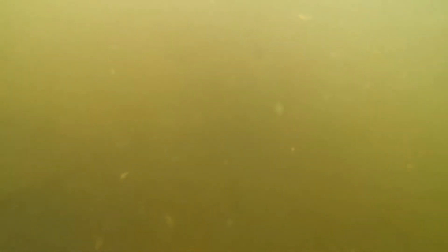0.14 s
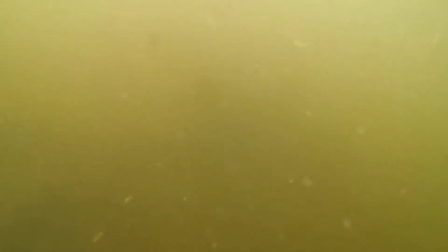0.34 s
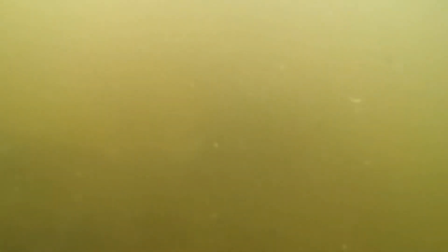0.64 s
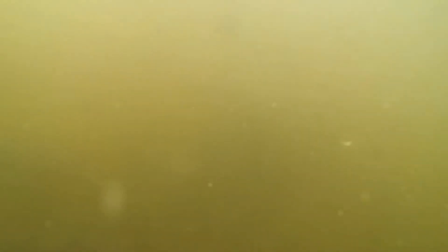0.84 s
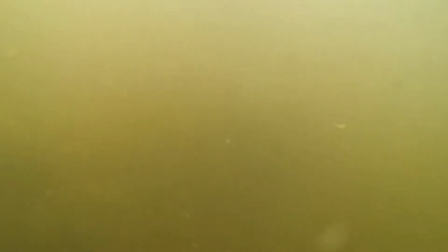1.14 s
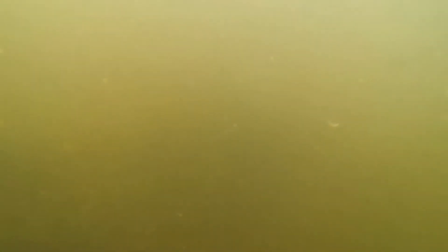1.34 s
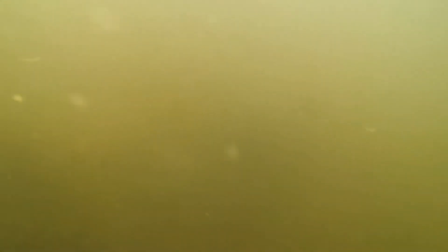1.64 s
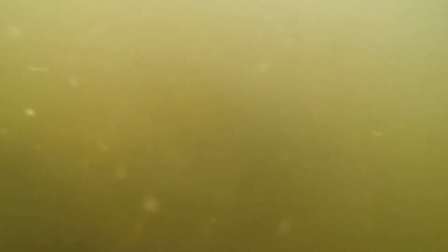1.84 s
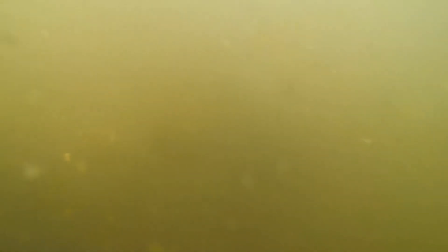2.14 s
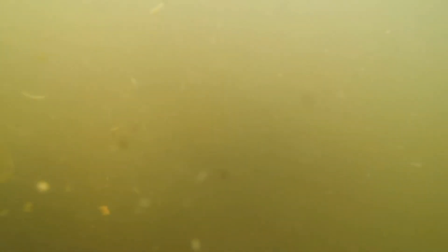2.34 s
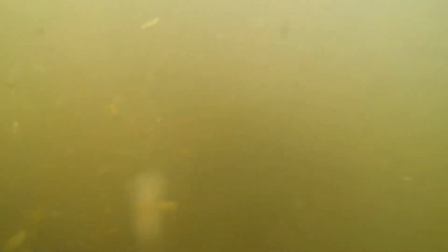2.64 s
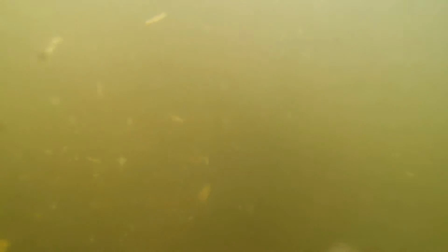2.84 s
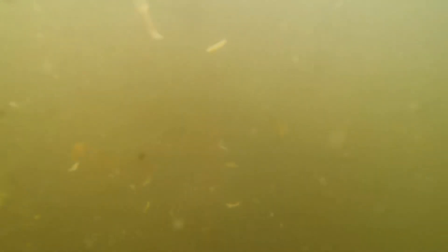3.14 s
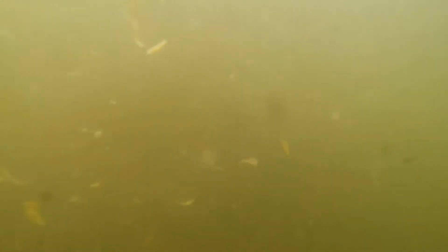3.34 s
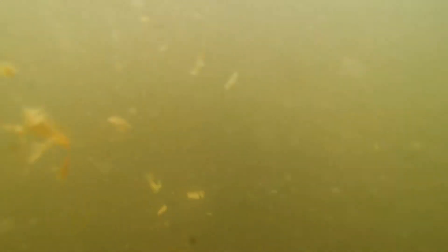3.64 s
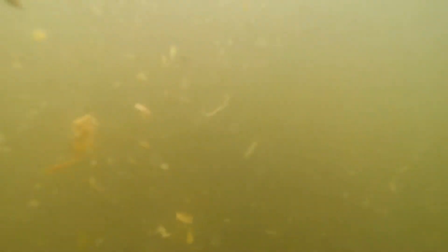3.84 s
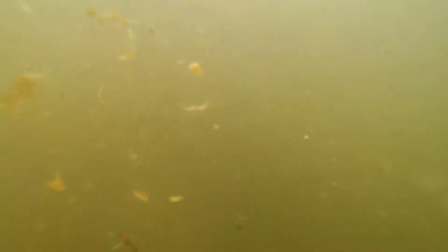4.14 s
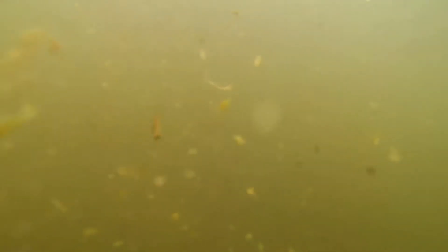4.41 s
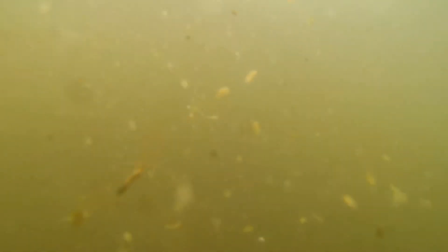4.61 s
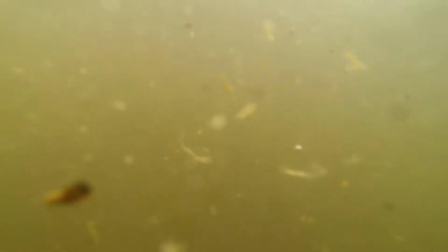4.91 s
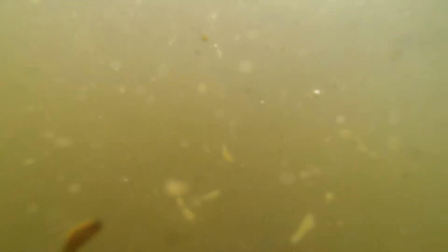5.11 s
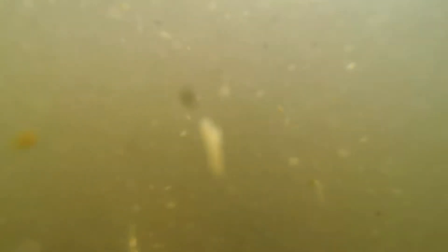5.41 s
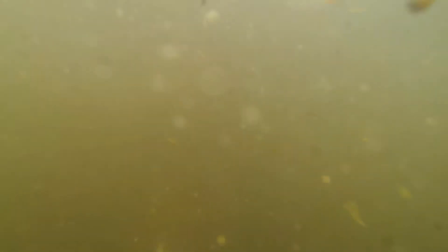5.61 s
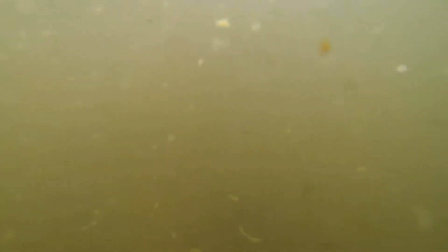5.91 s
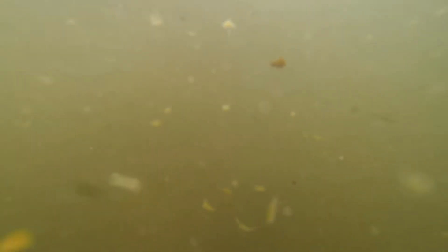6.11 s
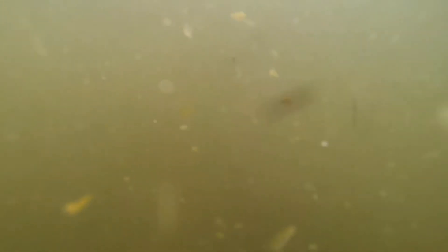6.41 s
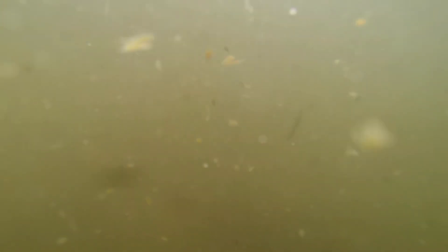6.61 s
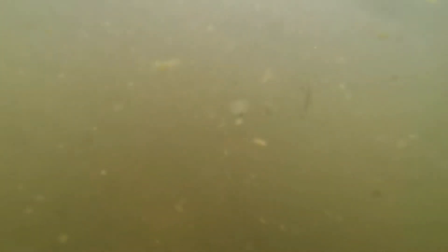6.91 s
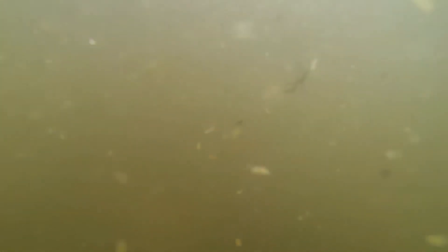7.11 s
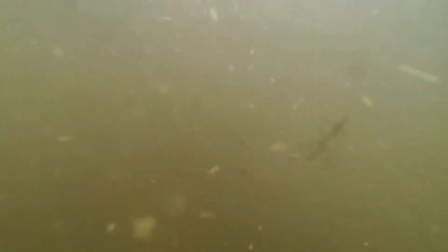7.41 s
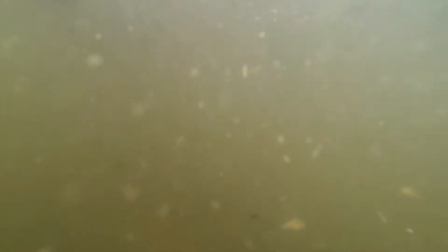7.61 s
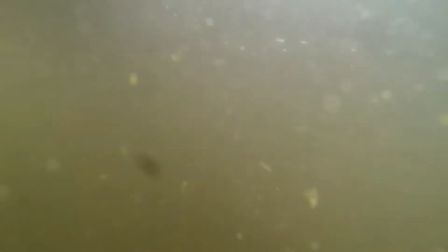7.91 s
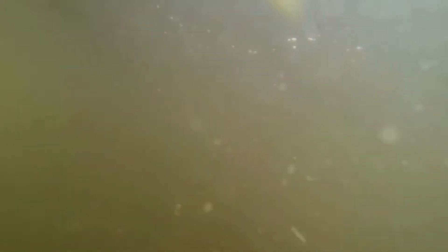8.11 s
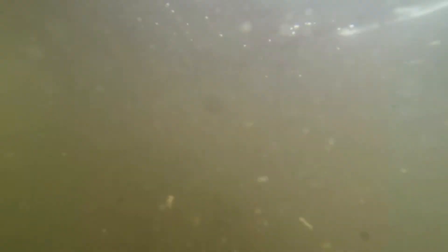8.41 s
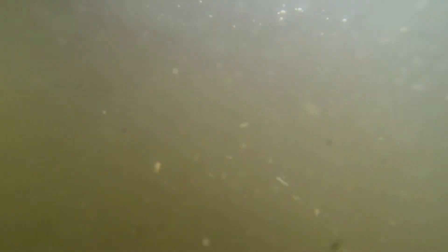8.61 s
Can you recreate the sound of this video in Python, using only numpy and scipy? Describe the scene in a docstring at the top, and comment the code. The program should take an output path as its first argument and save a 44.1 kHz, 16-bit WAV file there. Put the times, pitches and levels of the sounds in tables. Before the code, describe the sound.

Close, underwater sound in murky water. At 0 s a cut ends with a low thump, leaving soft wash, a rising low engine throb and faint scuffs. At 0.96 s a power cutter jolts in: loud, dense metallic rasp, bright and fizzy, stopping at 1.44 s amid low bubble blips and brushing grit. At 1.87 s it bites again and runs to 5.56 s, buzzing around 350-480 blows a second. It skims, digs in near 2.3 s, slips and catches around 3.1, 3.8 and 5.1 s; its whine grows, with squeals at 4.3-4.7 s and a pinched shriek towards the end. It stops abruptly with a bright double bubble pop. Then a quicker low throb, humming pump, airy hiss and thin breathy whistle near 5 kHz continue. Sharp knocks land at 5.84, 6.05 and 6.29 s, small bubbles around 7.1 s, and knocks with low sways from 8.4 s to the end.

```python
"""Murky water: a power cutter runs out of a cut over an engine's throb, then makes a short and a long cut.
Some 400 tooth blows a second ring the tool and the work; each cut jolts, skims and digs in, and its
whine grows. In the long cut the teeth slip and catch, and the pinched blade shrieks and squeals.
Afterwards the engine throbs, its pump hums and hisses, and a valve whistles. Around the cuts bubbles pop,
grit brushes the blade and small things knock on the submerged housing: dying sines and filtered bursts."""
import sys
import numpy as np
from scipy import signal
from scipy.fft import rfft, irfft
from scipy.io import wavfile
from scipy.ndimage import uniform_filter1d, map_coordinates

SR = 44100
rng = np.random.default_rng(int(sys.argv[2]) if len(sys.argv) > 2 else 0)


def inscribe(sig):
    """Save sig as 16-bit PCM at rate SR to the path in sys.argv[1].

    A 1-D sig is mono; a 2-D sig holds one channel per row.
    Samples are clipped to [-1, 1] before scaling.
    """
    pcm = np.round(np.clip(np.atleast_2d(sig).T, -1, 1) * 32767)
    wavfile.write(sys.argv[1], SR, pcm.astype(np.int16))


N = 385875
TIME = np.arange(N) / SR


def undb(db):
    """Decibels to gain."""
    return 10 ** (np.asarray(db) / 20)


def unit(x):
    """Scale to an rms of one."""
    return x / np.sqrt(np.mean(x ** 2))


def curves(rows):
    """Each column of a table as straight lines through time."""
    s, *columns = np.transpose(rows)
    return [np.interp(TIME, s, c) for c in columns]


def noise():
    """White noise for the whole scene."""
    return rng.standard_normal(N)


def sine(turns):
    """A sine with an rms of one, from its phase in turns."""
    return np.sqrt(2) * np.sin(2 * np.pi * turns)


def bump(t, half):
    """A smooth rise and fall around t = 0, down to 1/e at the half length."""
    return np.exp(-(t / half) ** 2)


def walk(rate):
    """Smooth random drift with a spread near one, from `rate` random steps a second."""
    k = max(int(SR / rate), 1)
    steps = np.repeat(rng.standard_normal(N // k + 1), k)
    smooth = uniform_filter1d(uniform_filter1d(steps, k), k)
    return unit(smooth[:N])


def resonate(x, modes, size=8192):
    """Ring x through steep-sided resonances; the response is causal and has unit energy."""
    f = np.fft.rfftfreq(size, 1 / SR)
    power = np.zeros(len(f))
    for hz, width, db in modes:
        detune = (f ** 2 - hz ** 2) / (width * (f + 1))
        power += undb(db) ** 2 / (1 + detune ** 2) ** 2
    # folding the cepstrum forward gives the minimum-phase response
    cepstrum = irfft(np.log(power + 1e-9) / 2)
    cepstrum[1:size // 2] *= 2
    cepstrum[size // 2 + 1:] = 0
    response = irfft(np.exp(rfft(cepstrum)))
    return signal.fftconvolve(x, response / np.linalg.norm(response))[:len(x)]


def add(out, s, sound):
    """Mix a sound in at a time."""
    start = max(int(s * SR), 0)
    out[start:start + len(sound)] += sound[:max(N - start, 0)]


def pulses(turns):
    """One click at each whole turn, shared between neighbouring samples."""
    at = np.flatnonzero(np.diff(np.floor(turns)) > 0)
    late = (np.ceil(turns[at]) - turns[at]) / (turns[at + 1] - turns[at])
    out = np.zeros(N)
    out[at], out[at + 1] = 1 - late, late
    return out


def ping(hz, t60, glide, rise):
    """A dying sine whose pitch drifts as it fades."""
    t = TIME[:SR // 2]
    fade = np.exp(-np.log(1000) * t / t60) * (1 - np.exp(-t / rise))
    return fade * np.sin(2 * np.pi * hz * (t + glide * t ** 2 / (2 * t60)))


def scuff(decay):
    """A short burst of rubbing: noise that swells fast and dies away."""
    t = TIME[:SR // 4] / decay
    return rng.standard_normal(len(t)) * (1 - np.exp(-2 * t)) * np.exp(-t) * 2


def delayed(x, lag_ms):
    """The sound after a path whose length may change."""
    return map_coordinates(x, [np.arange(N) - lag_ms * SR / 1000], order=3)


def reflect(x, path):
    """A close echo combs the sound; the comb slides as the path changes."""
    lag_ms, share = curves(path)
    return (x + share * delayed(x, lag_ms)) / np.sqrt(1 + share ** 2)


# further paths by the rippling surface and the bed: lag_ms, share (negative flips the wave)
WATER_PATHS = [(.95, -.17), (1.45, .17), (2.4, -.15), (4.1, .14)]


def shimmer(x):
    """Wandering paths through the water draw fine, wavering streaks in the sound."""
    return x + sum(share * delayed(x, lag_ms + .05 * walk(2.5)) for lag_ms, share in WATER_PATHS)


# colour of the wash: pitch_hz, relative density_db (per Hz)
WASH_COLOUR = [(15, -1.5), (35, -8.5), (90, -12.5), (200, -20.5), (350, -30.5), (700, -28.5), (1100, -37),
               (2200, -40), (5000, -46), (12500, -49.5), (15000, -62)]
# water pushing on the housing: centre_s, level_db, half_length_s
SURGES = [(0, -29.5, 0.035), (.98, -43, 0.03), (1.472, -33, 0.05), (1.894, -41, 0.02), (2.3, -43, .025),
          (3.1, -41, .05), (3.847, -44, 0.037), (4.88, -47, .1), (5.34, -36.5, 0.088), (8.6, -46.5, 0.23)]
CURRENT_DB, WASH_DB = -52, -51.5  # the steady push between surges; the wash


def water():
    """A soft wash of coloured noise, and slow surges as low rumble on the housing."""
    hz, db = np.transpose(WASH_COLOUR)
    f = np.fft.rfftfreq(N, 1 / SR)
    colour = undb(np.interp(np.log(f + 1), np.log(hz), db))
    wash = unit(irfft(rfft(noise()) * colour, N))
    push = undb(CURRENT_DB) + sum(undb(db) * bump(TIME - s, half) for s, db, half in SURGES)
    surge = unit(resonate(noise(), [(28, 14, 4.0), (49.0, 96, -7.0)]))
    return undb(WASH_DB) * wash + push * surge


# resonances that carry the throb: pitch_hz, width_hz, relative level_db
THROB_MODES = [(57.6, 24, 5), (115, 34, -5), (155.5, 36.4, 7.5), (273, 42.5, 0.5), (560, 700, -17.5)]


def engine_throb(turns):
    """Firings of slightly uneven force thud through the water."""
    force = undb(1.0 * walk(30))
    return unit(resonate(pulses(turns) * force, THROB_MODES))


# the pump's hum: multiple of the firing rate, level_db (at the loudest throb)
HUM = [(13, -74), (15, -67.5), (16, -72.5), (19, -72), (20, -76), (21, -69.5), (24, -87), (25, -69.5)]


def pump_hum(turns, throb_db):
    """Steady partials on multiples of the firing rate; they follow the engine's load."""
    hum = sum(undb(db + 1.5 * walk(2.94)) * sine(order * turns + rng.random()) for order, db in HUM)
    return hum * undb(throb_db - throb_db.max())


# resonances that carry the hiss: pitch_hz, width_hz, relative level_db
PUMP_MODES = [(1657, 380, -4), (2590, 620, -6.5), (2904, 230, 1), (3250, 310, -2), (4030, 2000, -15),
              (6280, 1340, -17)]


def pump_hiss():
    """Rushing flow: noise through the pump's resonances, slightly unsteady."""
    return unit(resonate(noise(), PUMP_MODES)) * undb(0.67 * walk(27))


# with the cutter off the flow whistles through a valve: time_s, pitch_hz, level_db
VALVE = [(5.55, 4900, -65), (5.7, 4920, -67), (6.1, 5070, -62.5), (6.7, 5080, -60.5), (7.1, 5040, -65.5),
         (7.6, 5100, -63), (8.75, 5160, -69.5)]


def valve_whistle():
    """Slow and quick eddies scatter a drifting tone into a breathy whistle."""
    hz, db = curves(VALVE)
    eddies = walk(330) + 1j * walk(330) + 0.66 * (walk(1300) + 1j * walk(1300))
    tone = np.exp(2j * np.pi * np.cumsum(hz) / SR)
    return undb(db) * (TIME > VALVE[0][0]) * unit(np.real(eddies * tone))


# engine: time_s, firing_rate_hz, throb_db, pump_hiss_db
ENGINE = [(0, 27.07, -69, -72), (.55, 24.5, -56.5, -68.5), (1.7, 24.3, -55.5, -67.5),
          (5.5, 28.67, -63.5, -56), (5.8, 28.82, -51, -57.5), (7, 28.78, -52, -59.5),
          (7.8, 28.92, -50, -58.5), (8.75, 28.22, -48.5, -58)]
# shifting reflection of the pump's sound: time_s, lag_ms, share
PUMP_ECHO = [(5.6, 0.51, .12), (6.7, 0.64, 0.16), (7.2, 0.64, 0.025), (8.2, 0.734, 0.31), (8.75, 0.73, .2)]


def engine():
    """One firing rate drives throb and hum; hiss and whistle pass the shifting reflection and the water."""
    hz, throb_db, hiss_db = curves(ENGINE)
    turns = np.cumsum(hz) / SR
    flow = undb(hiss_db) * pump_hiss() + valve_whistle()
    throb = undb(throb_db) * engine_throb(turns)
    return throb + pump_hum(turns, throb_db) + shimmer(reflect(flow, PUMP_ECHO))


# slow sways of the housing: start_s, level_db, pitch_hz, t60_s
SWAYS = [(.005, -17, 54, 0.014), (.965, -20.5, 64, 0.088), (1.439, -24, 64, 0.2), (1.89, -30, 49.4, 0.14),
         (8.419, -21.5, 41.3, 0.33), (8.725, -20, 45.96, 0.25)]


def sways():
    """The housing rocks: low dying sines that sag in pitch."""
    out = np.zeros(N)
    for s, db, hz, t60 in SWAYS:
        add(out, s, undb(db) * ping(hz, t60, glide=-0.12, rise=0.0005))
    return out


# grit brushing the idle blade: start_s, level_db, decay_s
GRIT = [(.138, -50.5, 0.011), (0.907, -48, 0.015), (1.476, -41, 0.0063), (1.58, -44.5, 0.0047),
        (1.692, -41.5, 0.0051), (5.728, -42, 0.0022), (6.856, -50, .004), (6.945, -52, .006),
        (7.686, -44.5, 0.0034), (7.982, -49, 0.0023), (8.413, -49, 0.00085)]


def grit():
    """Short scuffs ring the blade's broad resonances."""
    out = np.zeros(N)
    blade = [(1770, 550, -12.5), (2920, 1300, -5.0), (5170, 4000, -17.5)]
    for s, db, decay in GRIT:
        add(out, s, undb(db) * resonate(scuff(decay), blade))
    return out


# bubbles: start_s, level_db, pitch_hz, t60_s
BUBBLES = [(1.366, -16, 447.4, 0.044), (1.384, -24, 380.2, 0.11), (1.413, -25, 432, 0.092),
           (2.23, -23.5, 423, 0.14), (2.261, -27.5, 370, 0.085), (5.545, -10, 1890, 0.023),
           (5.561, -3.5, 1197, 0.04), (6.945, -42.5, 1370, 0.041), (7.128, -41.5, 2020, 0.041),
           (7.171, -33.5, 2680, 0.033)]


def bubbles():
    """Each bubble rings as a dying sine that creeps up in pitch, with a snap as it pinches off."""
    out = np.zeros(N)
    for s, db, hz, t60 in BUBBLES:
        add(out, s, undb(db) * ping(hz, t60, glide=0.046, rise=0.00086))
        add(out, s, undb(db - 7) * resonate(scuff(0.0022), [(hz, hz / 2, 0)]))
    return out


# knocks on the housing: start_s, peak_db, deep_thud_db, scuff_decay_s
KNOCKS = [(.909, -36, -71, 0.016), (1.648, -42, -60, 0.00064), (5.685, -40.5, -68, 0.014),
          (5.708, -39, -64, 0.014), (5.765, -43, -45, 0.0016), (5.824, -37, -52, 0.01),
          (5.838, -26.5, -38, 0.0036), (6.051, -16, -20, 0.00053), (6.2933, -20.5, -24.5, 0.00037),
          (7.249, -46, -29, 0.0023), (7.683, -38, -72, .001), (8.412, -23, -37, 0.0011),
          (8.432, -38, -60, 0.0061), (8.487, -44, -70, 0.0099), (8.565, -37, -53, 0.00087),
          (8.722, -37, -50, 0.0086)]
# housing modes: pitch_hz, width_hz, relative level_db
HOUSING = [(184, 137, 3), (487, 600, -6.5), (773, 210, -7), (903, 160, 3.5), (1193, 250, -1.5),
           (1330, 74, -3.5), (1740, 180, -9)]


def knocks():
    """A sharp push and a scuff ring the housing's modes, over a deep thud."""
    out = np.zeros(N)
    for s, db, thud_db, decay in KNOCKS:
        rub = scuff(decay)
        # first contact is one sharp push, then the thing rubs along
        knock = resonate(rub + 8 * signal.unit_impulse(len(rub)), HOUSING)
        add(out, s, undb(db) * knock / np.abs(knock).max())
        add(out, s, undb(thud_db) * ping(hz=92, t60=0.041, glide=-.1, rise=0.00013))
    return out


# the cuts: start_s, end_s, level_db, extra_fizz_db, run_out_db
CUTS = [(-1.9, 0.0012, -4, 7.5, -36), (.957, 1.439, 1.1, 9, -18.5), (1.874, 5.558, 0, 1, -34.5)]
ATTACK_S, RELEASE_S, RUN_OUT_S = 0.014, 0.0066, 0.047


def cuts():
    """Each cut starts fast, holds and runs out: its gain, the time since it began, its extra fizz."""
    gain, age, fizz_db = np.zeros((3, N))
    for start, end, db, extra_db, run_out_db in CUTS:
        since, after = np.maximum(TIME - start, 0), np.maximum(TIME - end, 0)
        run_out = undb(run_out_db) * np.exp(-after / RUN_OUT_S)
        release = np.maximum(np.exp(-after / RELEASE_S), run_out)
        gain += undb(db) * (1 - bump(since, ATTACK_S)) ** 2 * release
        on = TIME >= start
        age[on], fizz_db[on] = (since - after)[on], extra_db  # age stops at the cut's end
    return gain, age, fizz_db


# the teeth slip, then catch with a jerk: catch_s, slip_length_s, depth_db
SLIPS = [(1.135, 0.023, -1), (2.309, 0.033, -5.5), (3.075, 0.062, -8), (3.128, 0.047, -6),
         (3.706, 0.032, -4.5), (3.85, 0.069, -6.5), (5.135, 0.074, -3)]
CATCH_DB, CATCH_S = 1.5, 0.032


def grip():
    """The teeth's hold in dB: it ebbs in a slip and returns at once, overshooting."""
    db = np.zeros(N)
    for s, length, depth_db in SLIPS:
        slipping = np.clip(1 + (TIME - s) / length, 0, 1)
        slip = depth_db * np.sin(2.3 * slipping)
        catch = CATCH_DB * np.exp(-np.abs(TIME - s) / CATCH_S)
        db += np.where(TIME < s, slip, catch)
    return db


def rasp(turns, scatter_db, contact, scrape_db, chip_db, chips_per_s):
    """Each tooth strikes with its own force and scrapes on; now and then a chip snaps off."""
    tooth = turns.astype(int)
    force = undb(scatter_db * np.clip(rng.standard_normal(N // 20), -2, 2))[tooth]
    strikes = pulses(turns)
    scrape = unit(np.exp(-(turns % 1) / contact) * noise())
    teeth = unit(force * (strikes / np.std(strikes) + undb(scrape_db) * scrape))
    snaps = rng.random(N) < chips_per_s / SR
    chips = snaps * rng.choice([-1, 1], N) * (1 + rng.random(N))
    return unit(teeth + undb(chip_db) * unit(chips))


# resonances of tool and work, low to high: pitch_hz, width_hz, relative level_db
GROWL = [(80.4, 82, -7.5), (237, 58, -23), (375, 89, -2.5), (505, 570, -6), (710, 188, 2.5),
         (892, 160, 5.5)]
BARK = [(1244, 150, -11.5), (1330, 160, -20), (1634, 127, 2.5), (1781, 143, 3.5), (2110, 110, -14)]
RING = [(2464, 280, 3), (2656, 280, 2), (3032, 390, 5), (3243, 263, 3.5), (3763, 360, -7.5),
        (4127, 710, -8.5)]
SPRAY = [(5040, 306, -10.5), (5280, 360, 3.5), (5790, 810, 3.5), (6500, 600, 1), (7190, 770, -4),
         (7950, 540, -0.5)]
FIZZ = [(9280, 2200, 6.5), (10950, 430, 5), (12800, 890, -3.5), (14400, 1500, -29)]
SPRAY_SHARE = 0.246  # how much of a cut's extra fizz reaches the spray


def ringing_body(blows, churn, gain, fizz_db):
    """Dry blows ring and bark; blows blurred by stirred water growl, spray and fizz."""
    spray_gain = gain["spray"] * undb(SPRAY_SHARE * fizz_db)
    fizz_gain = gain["fizz"] * undb(fizz_db + 1.1 * walk(50))
    return (gain["growl"] * unit(resonate(churn, GROWL))
            + gain["bark"] * unit(resonate(blows, BARK))
            + gain["ring"] * unit(resonate(blows, RING))
            + spray_gain * unit(resonate(churn, SPRAY))
            + fizz_gain * unit(resonate(churn, FIZZ)))


# modes of the pinched blade's shriek: pitch_hz, width_hz, relative level_db
SHRIEK = [(1375, 230, -7.5), (3223, 190, 5.5), (4720, 225, 1), (5230, 190, -11), (6030, 330, -8.5),
          (10780, 530, -21.5), (12800, 610, -32)]
# the pinched blade squeals for a moment: centre_s, half_length_s, pitch_hz, level_db
SQUEALS = [(4.307, 0.031, 1680, -19.5), (4.46, 0.035, 3220, -21), (4.65, 0.099, 3174, -18),
           (4.729, 0.041, 1730, -19.5)]
SHRIEK_DB, SQUEAL_WIDTH_HZ = -25.5, 200  # shriek at full pinch, in the cutter's own mix


def pinched_blade(churn, pinch):
    """The pinch makes the blade shriek on its modes, with brief squeals on single narrow ones."""
    shriek = undb(SHRIEK_DB) * pinch * unit(resonate(churn, SHRIEK))
    for s, half, hz, db in SQUEALS:
        squeal = unit(resonate(churn, [(hz, SQUEAL_WIDTH_HZ, 0)]))
        shriek += undb(db) * bump(TIME - s, half) * squeal
    return shriek


# now and then the blade sings out at the octave: centre_s, half_length_s, rise_db
SINGS = [(2.676, 0.32, 15.5), (4.42, .11, 13.5), (5.29, .08, 17.5)]
# the whine grows through a cut; uneven teeth beat an octave below, until the pinch steadies the blade
WHINE_DB, WHINE_DB_PER_S, OCTAVE_DB, UNEVEN_DB = -51.5, 5, -46.5, -56.5
WHINE_WOBBLE = 0.059  # unsteadiness of the blade's push, in tooth cycles


def blade_whine(turns, age, skim, pinch):
    """The blade's steady push whines at the tooth rate, its octave and half the rate."""
    push = turns + WHINE_WOBBLE * walk(150)
    sing_db = sum(db * bump(TIME - s, half) for s, half, db in SINGS)
    whine = (undb(WHINE_DB + WHINE_DB_PER_S * age) * sine(push)
             + undb(OCTAVE_DB + sing_db) * (1 - skim) * sine(2 * push)
             + undb(UNEVEN_DB) * (1 - skim) * (1 - pinch) ** 2 * sine(push / 2))
    return whine * undb(2 * walk(35))


# blade speed: time_s, tooth_rate_hz
TEETH = [(1.0, 410), (1.44, 440), (2.28, 410), (2.45, 472), (2.9, 482), (3.1, 352), (3.22, 380),
         (3.45, 335), (3.87, 345), (4.1, 392), (4.24, 374), (4.34, 433), (4.52, 432), (4.62, 388),
         (4.83, 438), (4.96, 394), (5.3, 377), (5.46, 478)]
# how hard the tool is pressed on: time_s, pressure_db
PRESSURE = [(1.0, 1), (1.1, -3), (1.25, -3), (1.43, -1), (1.9, 1), (2.1, 1.5), (2.42, -1), (2.95, 2.3),
            (3.2, 0.6), (3.53, -2.5), (3.7, 1.7), (4.0, 0), (4.27, -0.3), (4.39, -5), (4.52, -2.5),
            (4.86, -2.5), (5.0, 0.5), (5.55, -0.5)]
# a deep cut pinches the blade: time_s, pinch (0-1)
PINCH = [(3.5, 0.12), (4.3, 0.26), (4.5, 0.62), (4.8, 0.54), (5.25, 0.92), (5.55, 0.78)]
# how each resonance group answers: level_db, dB per dB of pressure, share of a slip,
# jolt_db, skim_db, dig_db, full_pinch_db
ANSWER = {"ring": (-16.5, 1, 1, 2.5, 0.5, -0.5, -.5), "growl": (-33, 0.72, 0.6, 12.5, -7, 4.5, 5),
          "bark": (-27.5, 0.32, 1, 6.5, -4, 2, 6), "spray": (-34.5, 1, 1.04, 3, 5, 0, 3),
          "fizz": (-47, 1.15, 0.9, 8, 2, -1, -1)}
# a reflection from the work shifts as the tool moves: time_s, lag_ms, share
WORK_ECHO = [(1.198, 0.26, 0.23), (1.9, 0.53, 0.015), (2.3, 0.69, 0.07), (3.0, 0.55, .02),
             (3.3, 0.27, 0.09), (3.901, 0.45, 0.055), (4.2, 0.423, 0.35), (4.45, 0.42, 0.027),
             (5.55, .43, 0.17)]
# every cut opens alike: a jolt, the teeth skim the surface, then they dig in
JOLT_S, SKIM_AT_S, SKIM_HALF_S, DIG_AT_S, DIG_HALF_S = 0.044, .2, 0.16, 0.468, 0.037
CHURN_DB, CHURN_PINCH_DB = -7, 7  # stirred water against the tooth blows, and its rise at full pinch


def cutter():
    """Tooth blows ring the tool and the work, while the blade's steady push whines."""
    (hz,), (pressure_db,), (pinch,) = curves(TEETH), curves(PRESSURE), curves(PINCH)
    running, age, fizz_db = cuts()
    jolt, dig, grip_db = np.exp(-age / JOLT_S), bump(age - DIG_AT_S, DIG_HALF_S), grip()
    skim = np.exp(-((age - SKIM_AT_S) / SKIM_HALF_S) ** 4)
    gain = {}
    for name, (db, follow, slip, jolt_db, skim_db, dig_db, pinch_db) in ANSWER.items():
        held_db = db + follow * pressure_db + slip * grip_db
        opening_db = jolt_db * jolt + skim_db * skim + dig_db * dig
        gain[name] = undb(held_db + opening_db + pinch_db * pinch)
    turns = np.cumsum(hz * (1 + .026 * walk(42))) / SR
    # teeth catch a little early or late, and the blade chatters in the cut
    blows = rasp(turns + 1 + .07 * walk(500), scatter_db=2.5, contact=0.75,
                 scrape_db=5.5, chip_db=-13.5, chips_per_s=110)
    blows = blows * undb(0.22 * walk(60))
    # the harder the pinch, the more stirred water: a smoother rush
    churn = unit(blows + undb(CHURN_DB + CHURN_PINCH_DB * pinch) * noise())
    body = reflect(ringing_body(blows, churn, gain, fizz_db), WORK_ECHO)
    wet = shimmer(body + pinched_blade(churn, pinch))
    return running * (0.89 * wet + blade_whine(turns, age, skim, pinch))


def scene():
    """Everything reaches one microphone through the water."""
    small_things = sways() + grit() + bubbles() + knocks()
    return (water() + engine() + small_things + cutter())[None]


def record(dry):
    """The camera rounds the highest peaks and cuts the top above 15350 Hz."""
    rounded = np.tanh(0.81 * dry) / 0.8
    return signal.sosfilt(signal.ellip(8, .2, 70, 15350, fs=SR, output="sos"), rounded)


dry = scene()
out = record(dry)
inscribe(out)
```